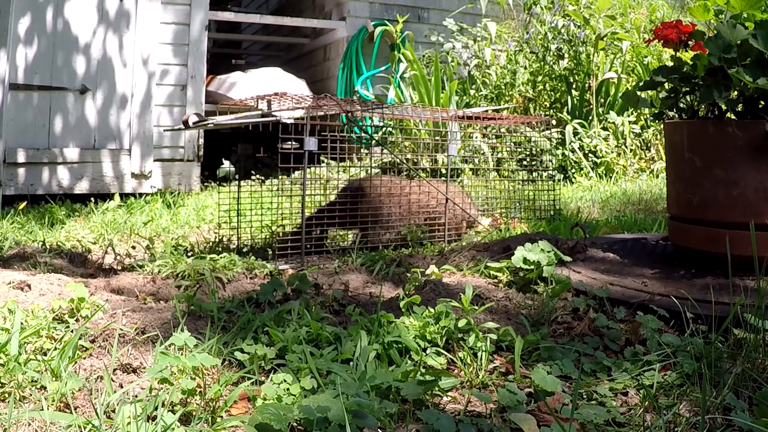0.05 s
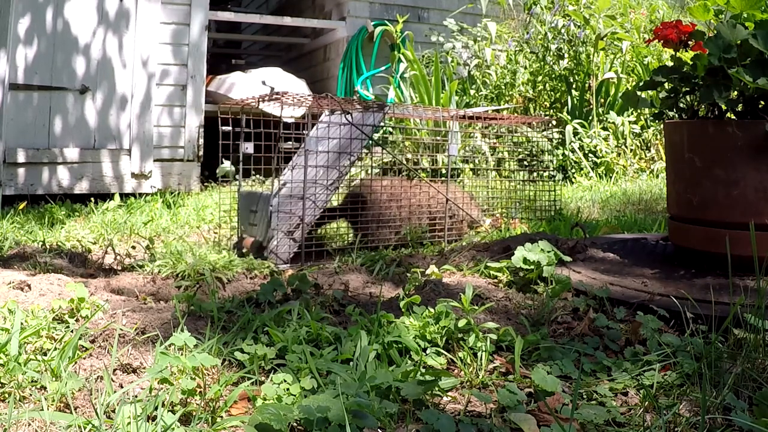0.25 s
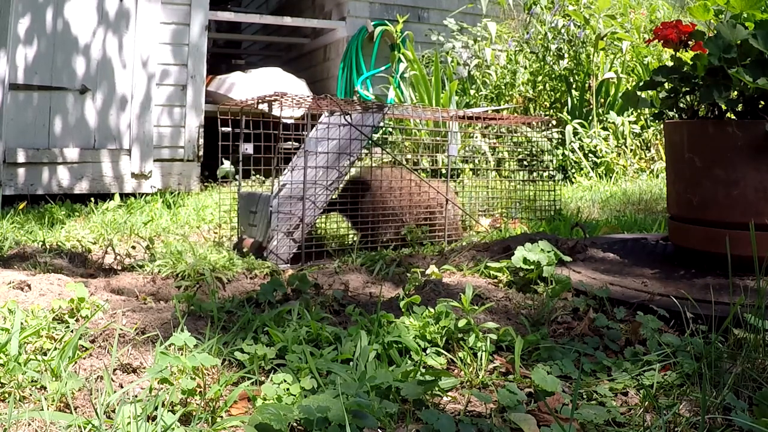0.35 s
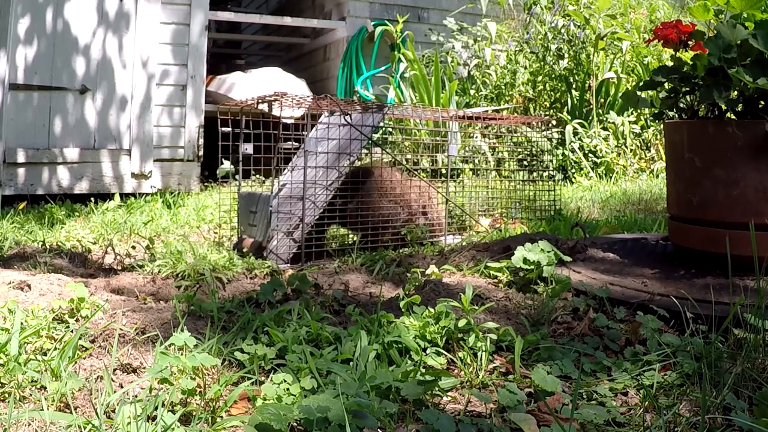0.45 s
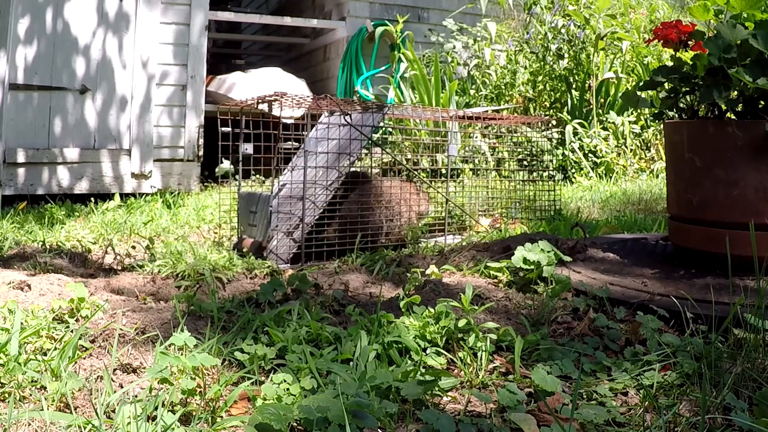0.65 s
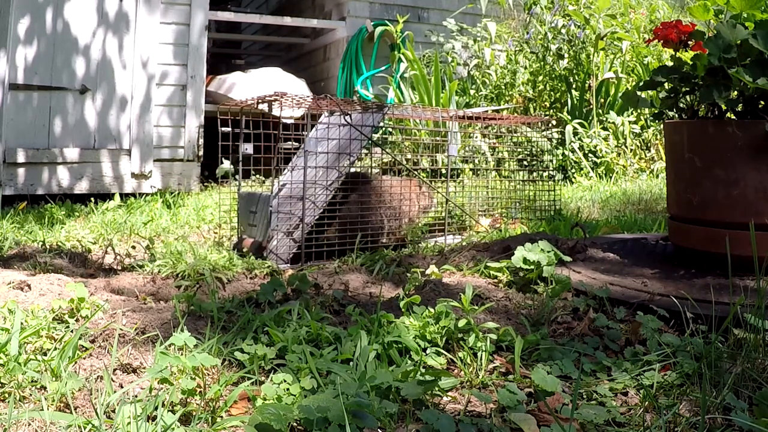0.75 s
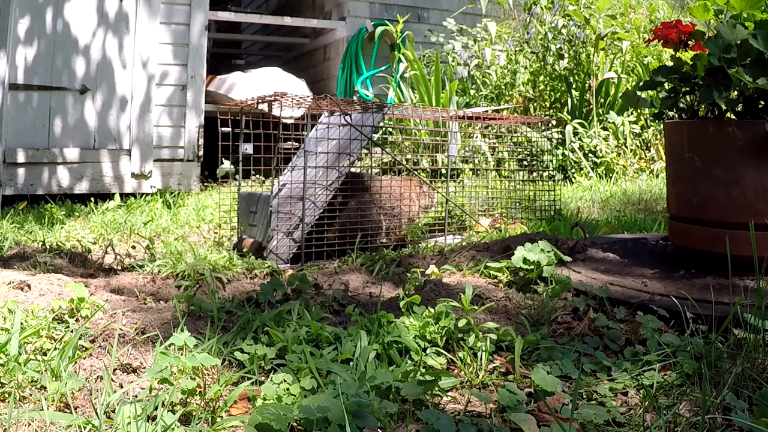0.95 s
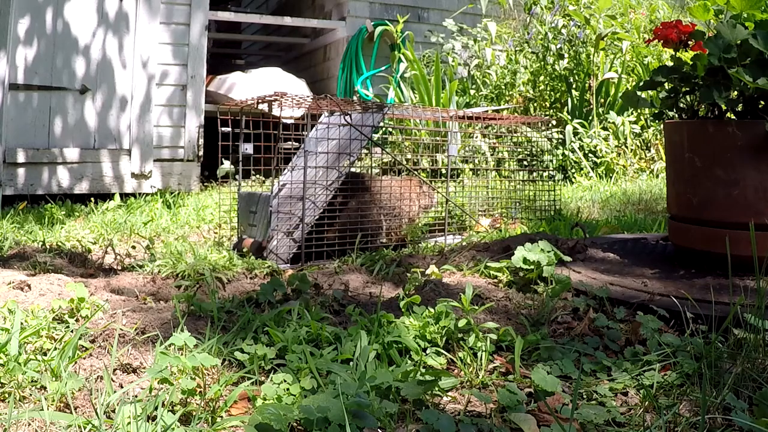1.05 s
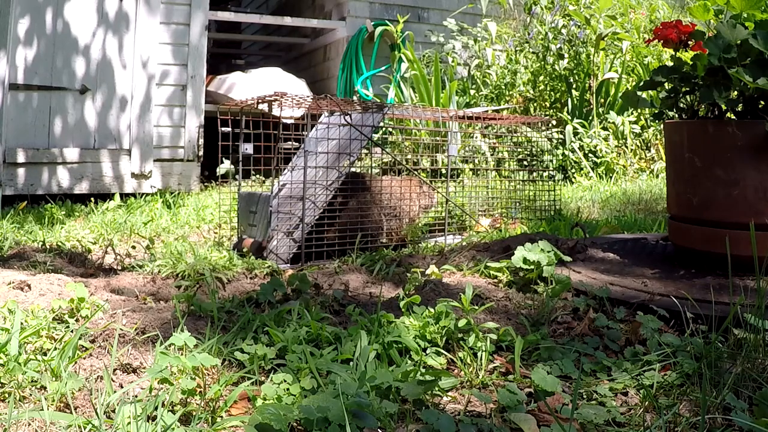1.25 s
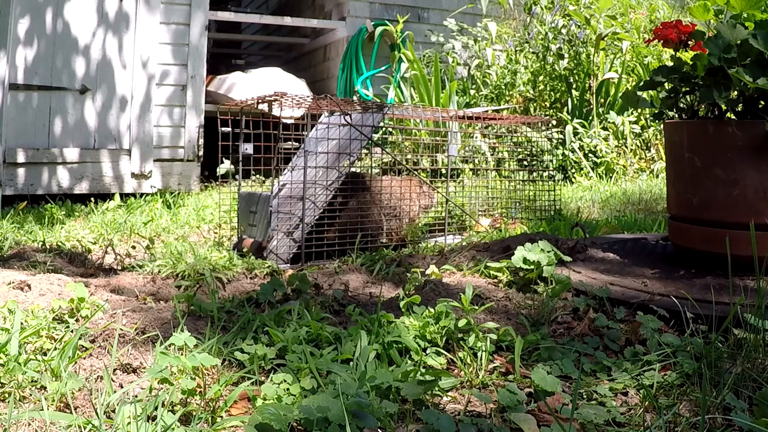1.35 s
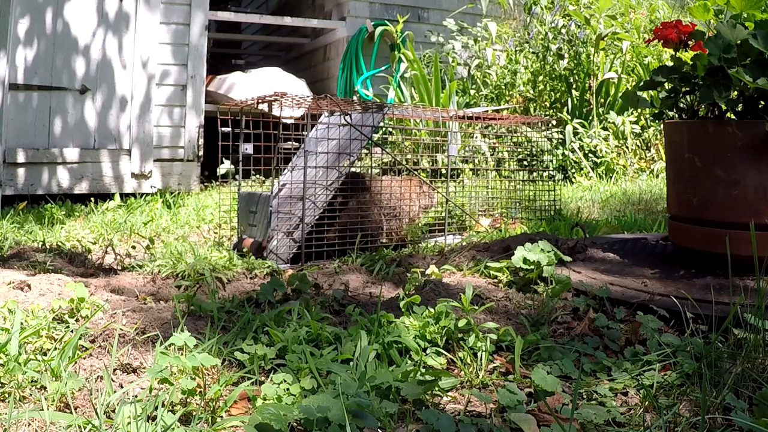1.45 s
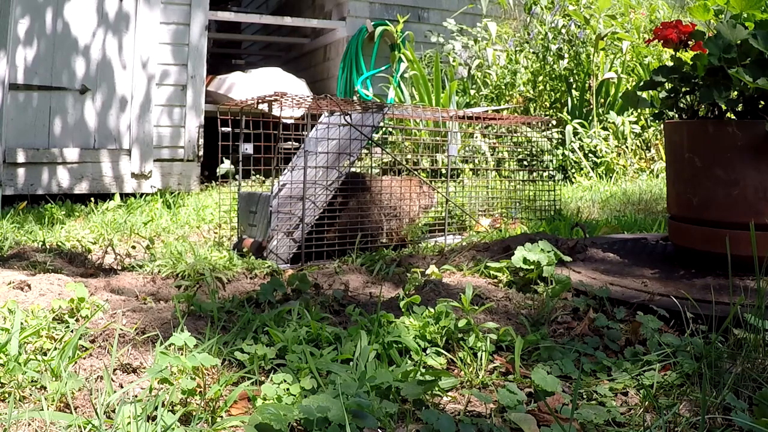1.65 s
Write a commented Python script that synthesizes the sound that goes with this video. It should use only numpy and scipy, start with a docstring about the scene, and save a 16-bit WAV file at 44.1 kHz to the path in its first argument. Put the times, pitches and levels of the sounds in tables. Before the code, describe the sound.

The metal door of a nearby cage bangs shut after a few faint clicks, shaking the wire mesh with a bright rattle and a dull thud. It settles quickly, leaving soft garden air and a few far-off bird chirps.

```python
"""A quiet garden, where a wire cage trap springs shut. Air hums softly and birds whistle from the bushes.
The trigger rod slips off its catch with light ticks, and the sheet-metal door squeaks as it slides,
over a faint hiss. It slams on the frame and rattles to rest: each hit sets hundreds of wires ringing,
while the door booms and the cage thuds on the soil. A faint rumble lingers and the birds call on."""
import sys
import numpy as np
from scipy import signal
from scipy.fft import rfft, irfft, next_fast_len
from scipy.io import wavfile

SR = 44100
rng = np.random.default_rng(int(sys.argv[2]) if len(sys.argv) > 2 else 0)


def dump_mix(stems):
    """Bounce the given channels to the path in sys.argv[1] as a 16-bit WAV at rate SR."""
    frames = np.atleast_2d(stems).T  # one column per channel
    limited = np.clip(frames, -1, 1)  # hard clip at full scale
    pcm = np.round(limited * 32767).astype(np.int16)
    wavfile.write(sys.argv[1], SR, pcm)


N = 74970
CUTOFF_HZ = 15900


def amp(db):
    """Turn decibels into a gain to multiply by."""
    return 10 ** (np.asarray(db) / 20)


def at_hz(points, hz):
    """Read between a table's rows on a log-frequency axis."""
    freqs, values = np.transpose(points)
    return np.interp(np.log(hz + 1e-3), np.log(freqs), values)


def noise():
    """Two unrelated channels of white noise."""
    return rng.standard_normal((2, N))


def fade(start, t60):
    """Die away from a start time; t60 is the seconds it takes to fall 60 dB."""
    age = (np.arange(N) - int(start * SR)) / SR
    return (age >= 0) * np.exp(-np.log(1000) * np.maximum(age, 0) / t60)


def bursts(hits, t60):
    """A loudness curve that jumps at each hit, then fades."""
    return np.sqrt(sum((amp(db) * fade(start, t60)) ** 2 for start, db in hits))


def colour(x, points, size=4096):
    """Shape the tone to follow a table; white noise keeps its power."""
    gain = amp(at_hz(points, np.arange(size // 2 + 1) * SR / size))
    cepstrum = irfft(np.log(gain / np.sqrt(np.mean(gain ** 2))))
    cepstrum[1:size // 2] *= 2   # folded so that nothing sounds before its hit
    cepstrum[size // 2 + 1:] = 0
    response = irfft(np.exp(rfft(cepstrum)))
    return signal.fftconvolve(x, response[None], axes=1)[:, :N]


def high_pass(x, hz):
    """Steeply cut everything below hz."""
    return signal.sosfilt(signal.butter(6, hz, "high", fs=SR, output="sos"), x)


def panned(pan_db):
    """Left and right gains; positive leans left."""
    return amp(np.array([[1], [-1]]) * pan_db / 2)


def stereo(pair, width, pan=None):
    """Spread two signals: both ears share the mid, and get the side with opposite signs."""
    size = 2 * next_fast_len(N // 2 + SR // 20)
    hz = np.arange(size // 2 + 1) * SR / size
    mid, side = rfft(pair, size)
    both = mid + side * amp(at_hz(width, hz)) * [[1], [-1]]
    return irfft(both * (1 if pan is None else panned(at_hz(pan, hz))))[:, :N]


def ring(hits, modes, strengths=None, size=170):
    """Each hit starts every mode (a natural tone of the metal) as a dying sine wave."""
    if strengths is None:   # push each mode one way or the other
        strengths = np.sign(rng.standard_normal((len(hits), 2, len(modes))))
    hz, level_db, t60 = np.transpose(modes)
    pole = (2j * np.pi * hz - np.log(1000) / t60) / SR
    steps = np.arange(size)   # size blocks of size samples, for speed
    within = np.exp(np.outer(pole, steps))
    across = np.exp(np.outer(steps * size, pole))
    out = np.zeros((2, N))
    for (start, db), strength in zip(hits, strengths):
        gains = amp(db + level_db) * strength
        i = int(start * SR)
        out[:, i:i + size * size] += ((gains[:, None] * across) @ within).imag.reshape(2, -1)
    return out


# tone of the air: (frequency [Hz], relative level [dB])
AIR_COLOUR = [(30, -35), (100, -33), (138, -4), (162, 1.5), (300, -11), (666, -25), (1320, -23),
              (2600, -32), (4500, -35), (7000, -33.5), (11000, -47.5), (16000, -56)]
# how wide the garden sounds: (frequency [Hz], side against mid [dB])
GARDEN_WIDTH = [(60, 1.5), (160, -8.5), (400, -1.5), (3000, -2), (10000, -4)]
# tone of the rumble: (frequency [Hz], relative level [dB])
RUMBLE_COLOUR = [(20, -14), (45, 0), (90, -4.5), (160, -8.5), (300, -25), (1000, -60)]
# its rise and fall: (time [s], relative level [dB])
RUMBLE_SWELL = [(.22, -39.5), (.27, 3), (.45, 0.5), (.7, -8.5), (1.1, -14.5), (1.28, -40)]

def garden():
    """Still outdoor air, and a faint low rumble that lingers after the slam."""
    air = amp(-69) * colour(noise(), AIR_COLOUR)
    rumble_db = -66.5 + np.interp(np.arange(N) / SR, *np.transpose(RUMBLE_SWELL))
    rumble = amp(rumble_db) * colour(noise(), RUMBLE_COLOUR)
    return stereo(air + rumble, GARDEN_WIDTH)


def whistle(note, flutter_hz=160):
    """A bird note or squeak: a swelling, gliding tone whose pitch flutters at random."""
    start, length, from_hz, to_hz, level_db, pan_db, depth = note
    progress = np.minimum(np.arange(SR // 3) / SR / length, 1)
    smoothing = signal.butter(2, flutter_hz, fs=SR, output="sos")
    flutter = signal.sosfilt(smoothing, rng.standard_normal(len(progress)))
    hz = (from_hz + (to_hz - from_hz) * progress) * (1 + depth * flutter / flutter.std())
    tone = np.sin(np.pi * progress) * np.sin(2 * np.pi * np.cumsum(hz) / SR)
    return amp(level_db) * panned(pan_db) * np.pad(tone, (int(start * SR), N))[:N]


# bird notes: (time [s], length [s], start pitch [Hz], end pitch [Hz], relative level [dB],
# pan [dB], flutter [share of pitch])
BIRD_NOTES = [(0.0, 0.11, 4240, 4200, -64, 6.5, .02), (.672, 0.042, 4720, 4720, -59, 0, .02),
              (.699, .04, 4760, 4650, -47, 1, .024), (.735, 0.0266, 4730, 4551, -42.5, 4.5, .024),
              (0.764, 0.058, 4620, 4480, -48, -1, .02), (1.048, .026, 4220, 4200, -68, 8.5, .008),
              (1.11, .12, 4130, 4174, -67, 1, .014), (1.126, 0.085, 3563, 3620, -72.5, 3, .015),
              (1.12, 0.19, 2718, 2701, -61.5, 3.5, .016), (1.22, .14, 3250, 3102, -74.5, 4, .025),
              (1.255, 0.04, 1319, 1350, -67, 5, 0.027), (1.27, 0.065, 2702, 2627, -55.5, 11, .025),
              (1.356, .026, 2700, 2520, -46.5, 10, .03), (1.375, 0.0597, 2380, 2720, -55.5, 2, .04),
              (1.4, 0.029, 2000, 1860, -72, 7, .02), (1.479, .22, 2680, 2710, -65, 3, .015)]

def birds():
    """Distant notes, smeared by echoes from leaves and walls."""
    song = sum(whistle(note) for note in BIRD_NOTES)
    scatter = stereo(noise() * fade(0, t60=.48), GARDEN_WIDTH)
    scatter /= np.sqrt(np.sum(scatter ** 2) / 2)
    echoes = signal.fftconvolve(song, scatter, axes=1)[:, :N]
    return amp(-3) * song + amp(-2) * echoes


# the loudest wires: (pitch [Hz], relative level [dB], ring time [s])
LOUD_WIRES = [(1360, -15.5, .35), (3784, -8.5, 0.3), (4270, -11, .45), (4379, -2.5, .33), (4343, -3, .36),
              (4690, -6.5, .48), (5150, -3.5, 0.42), (5100, -2, 0.36), (5702, -5, 0.38), (6150, -3.5, 0.42),
              (6140, -1, .35), (6400, 0, .35), (6380, -0.5, .38), (6480, -0.5, 0.52), (6825, -0.5, .45),
              (7284, 3, .4), (7600, -8, 0.42)]
# tone of the mesh: (frequency [Hz], relative level [dB])
WIRE_COLOUR = [(300, -25.5), (900, -30.5), (1300, -19.5), (1900, -15), (2700, -5), (3600, -5.5),
               (4500, -1.5), (6800, 0.5), (7600, -1.5), (8100, -13.5), (9600, -11.5), (10800, -25.5),
               (14800, -24), (16000, -41)]
# how long the wires ring: (pitch [Hz], ring time [s])
WIRE_T60 = [(300, .33), (1300, .27), (2700, .28), (4500, .31), (7000, .325), (10000, .3), (15000, .34)]

def wire_modes(count=560, spread_db=1.5, t60_spread=.45):
    """Hundreds of short wires each have their own pitch, level and ring time."""
    hz = 300 + (CUTOFF_HZ - 300) * ((np.arange(count) + rng.random(count)) / count) ** 1.25
    db = -41 + at_hz(WIRE_COLOUR, hz) + spread_db * 2 * (rng.random(count) - .5)
    t60 = at_hz(WIRE_T60, hz) * np.exp(t60_spread * (rng.random(count) - .5))
    loud_wires = np.array(LOUD_WIRES) + [0, -37.5, 0]   # shifts only the level
    return np.vstack([np.transpose([hz, db, t60]), loud_wires])


# tone of wire hitting wire: (frequency [Hz], relative level [dB])
CONTACT_COLOUR = [(100, -32.5), (500, -20), (1800, -19), (2700, -11), (3500, -6), (4500, 2), (7000, 2.5),
                  (8200, -10.5), (9600, -11), (11000, -19.5), (14800, -16.5), (16000, -34.5)]

def strike_mesh(hits, wires, contacts_per_s=3500):
    """Each hit is a quickly dying chatter of wire on wire and leaves the mesh ringing."""
    chatter = noise() * (rng.random(N) < contacts_per_s / SR) * np.sqrt(SR / contacts_per_s)
    grind = amp(1.5) * noise()
    force = (amp(-.5) * chatter + grind) * bursts(hits, t60=.067)
    return amp(-17.5) * colour(force, CONTACT_COLOUR) + ring(hits, wires)


# the rod touches its catch: (time [s], relative level [dB])
ROD_SLIPS = [(.0945, -21), (.1005, -23), (.113, -26), (.126, -23.5), (.137, -24.5), (.149, -29),
             (.165, -36), (.19, -38), (.207, -35.5)]
# the rod's tones: (pitch [Hz], relative level [dB], ring time [s])
ROD_MODES = [(344, -19.5, .2), (590, -17.5, .2), (1243, -6.5, .25), (1810, -11, .15), (2185, -6, 0.19),
             (2631, -0.5, 0.1), (2734, -1, 0.25), (4750, -1, .22), (5427, 2, 0.18), (6900, 1, .22)]

def trigger(wires):
    """The rod slips off its catch; the light touches ring it and only the high wires."""
    ticks = high_pass(strike_mesh(ROD_SLIPS, wires), hz=2150)
    return ticks + amp(-32.5) * ring(ROD_SLIPS, ROD_MODES)


def high_hiss(rush_db=17.5, rush_s=.016):
    """A faint high scraping hiss, with a brief rush of hiss just before the slam."""
    t = np.arange(N) / SR
    start, end = ROD_SLIPS[0][0], DOOR_CLASHES[0][0]
    level_db = -47 + rush_db * np.exp(np.minimum(t - end, 0) / rush_s)
    hiss = noise() * amp(level_db) * (t > start) * (t < end)
    return high_pass(colour(hiss, WIRE_COLOUR), hz=2150)


# door squeaks near 1.25 kHz, and the slipping rod's thin ring near 2.7 kHz: (time [s], length [s], start pitch
# [Hz], end pitch [Hz], level [dB], pan [dB], flutter [share of pitch])
SQUEAKS = [(.119, .018, 1250, 1215, -44, 0, .025), (.122, .011, 2700, 2650, -40, 0, .035),
           (.135, .08, 1250, 1250, -58, 0, .025), (.144, .014, 2700, 2700, -45, 3, .035),
           (.2, 0.04, 1280, 1255, -52, 2.5, 0.024)]

def squeaks():
    """The door gives short squeaks as it slides, and the slipping rod rings thinly near 2.7 kHz."""
    return sum(whistle(note) for note in SQUEAKS)


# the door lands, the lock drops and bounces: (time [s], relative level [dB])
DOOR_CLASHES = [(0.2421, -3), (.2495, -3.5), (0.2657, -1), (0.273, -3), (.279, -2.5), (0.2843, -2),
                (.292, -6.5), (.301, -7.5), (.32, -13.5), (0.336, -13.5), (.348, -15.5), (.361, -10),
                (.372, -14.5), (0.389, -18.5), (0.417, -22.5), (.438, -27.5)]

def slam(wires):
    """A bright snap as the door's edge lands, then clashes through the mesh."""
    snap = noise() * fade(DOOR_CLASHES[0][0], t60=.015)
    return amp(-18.5) * high_pass(snap, hz=4030) + strike_mesh(DOOR_CLASHES, wires)


# the door's weight shakes the frame: (time [s], relative level [dB])
DOOR_THUDS = [(.247, -18.5), (.2655, -8), (0.2727, -1), (0.2786, 2.5), (0.2838, -1), (0.295, -12.5),
              (.326, -16), (.347, -15.5), (.365, -20.5), (.376, -18.5)]
# tones of the door and frame: (pitch [Hz], relative level [dB], ring time [s])
DOOR_MODES = [(151, 0, .17), (162, -8.5, .12), (194, -14, .22), (248.8, -2, .23), (310.8, -15, .24),
              (399.5, -10, .22), (433, -11, .17), (491.3, -10, .22), (506, -4.5, .12), (575, -7, .12),
              (655, -8, .13), (790, -10, .1), (935, -12, .12), (1351, -21, .2)]
# tone of the thud on the soil: (frequency [Hz], relative level [dB])
SOIL_COLOUR = [(30, -31.5), (95, -27.5), (135, -1.5), (260, 1.5), (340, -8.5), (520, -1.5), (850, -13.5),
               (1100, -15), (1500, -20), (2500, -38.5), (8000, -71.5)]

def door_boom(side_lag_s=.0012):
    """The metal sheet booms low over a short, dull thud of the cage on the soil."""
    strengths = 1 + .3 * rng.standard_normal((len(DOOR_THUDS), 2, len(DOOR_MODES)))
    boom = ring(DOOR_THUDS, DOOR_MODES, strengths)
    boom[1] = np.roll(boom[1], int(side_lag_s * SR))   # spreads sideways a moment later
    thud = colour(noise() * bursts(DOOR_THUDS, t60=.074), SOIL_COLOUR)
    return amp(-22) * boom + amp(-17) * thud


# how wide the trap sounds: (frequency [Hz], side against mid [dB])
TRAP_WIDTH = [(130, -0.5), (290, -8.5), (640, -10), (1400, -7.5), (3100, -17.5), (4700, -14), (6800, -2.5),
              (9000, -1), (14000, -6)]
# which way it leans: (frequency [Hz], left against right [dB])
TRAP_PAN = [(130, -5), (640, -6), (1400, 6), (3100, -1), (6800, 1), (9000, -3), (14000, -0.5)]

def scene():
    """The trap in front, too open to give off deep bass; the garden around it."""
    wires = wire_modes()
    trap = door_boom() + high_hiss() + trigger(wires) + slam(wires)
    trap = stereo(high_pass(trap, hz=122), TRAP_WIDTH, TRAP_PAN)
    return trap + squeaks() + birds() + garden()


def record(dry):
    """Round off the tallest peaks and steeply cut the highest treble."""
    peak_limit = .85
    rounded = dry / (1 + (dry / peak_limit) ** 4) ** .25
    return signal.sosfilt(signal.cheby2(14, 60, CUTOFF_HZ, fs=SR, output="sos"), rounded)


dry = scene()
out = record(dry)
dump_mix(out)
```